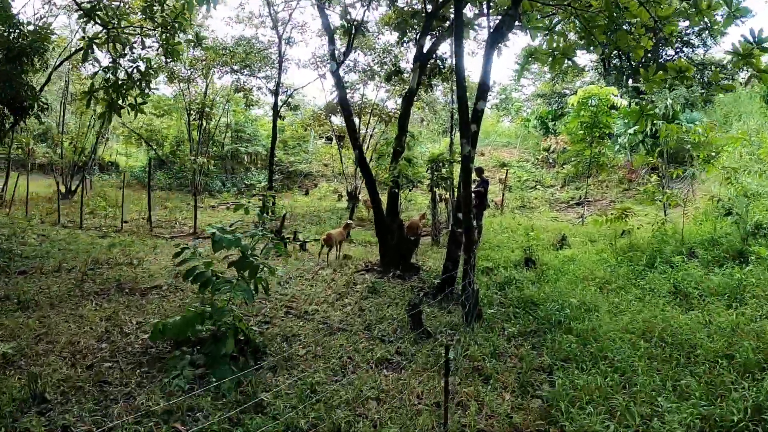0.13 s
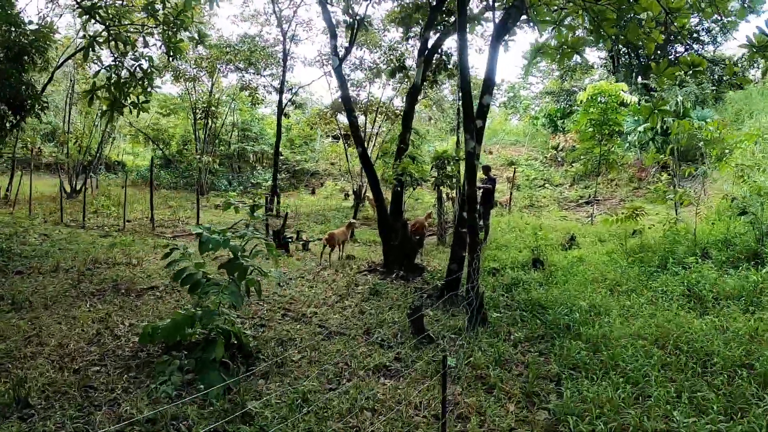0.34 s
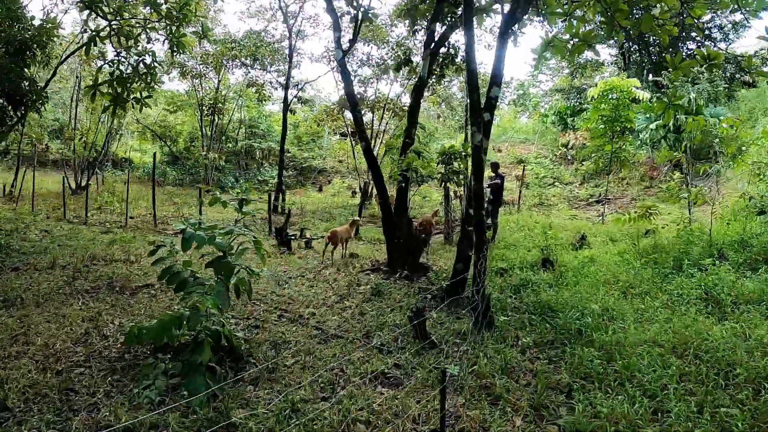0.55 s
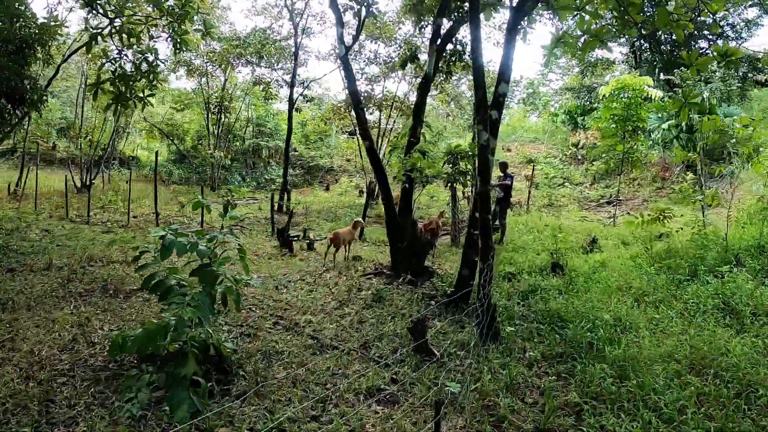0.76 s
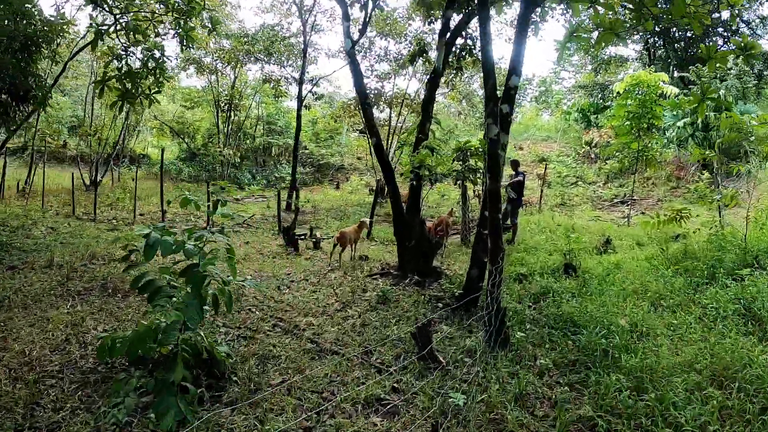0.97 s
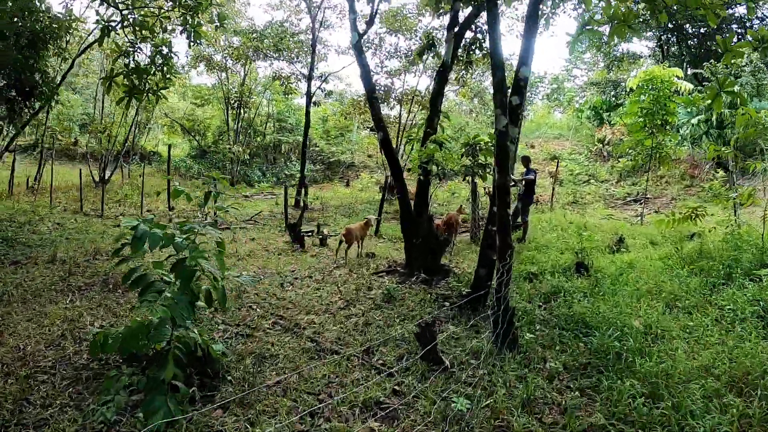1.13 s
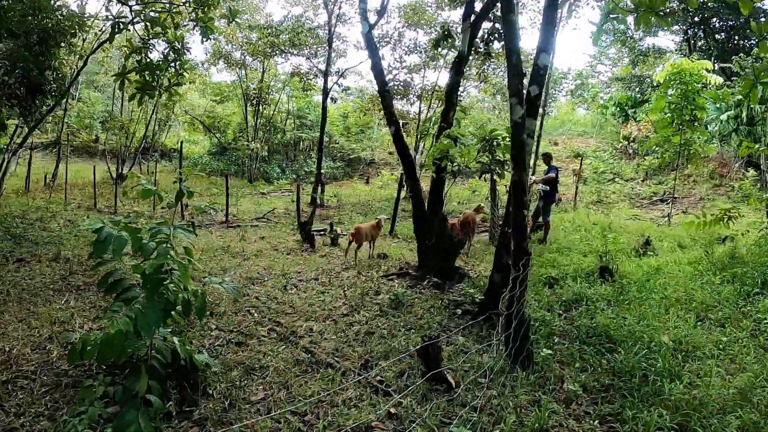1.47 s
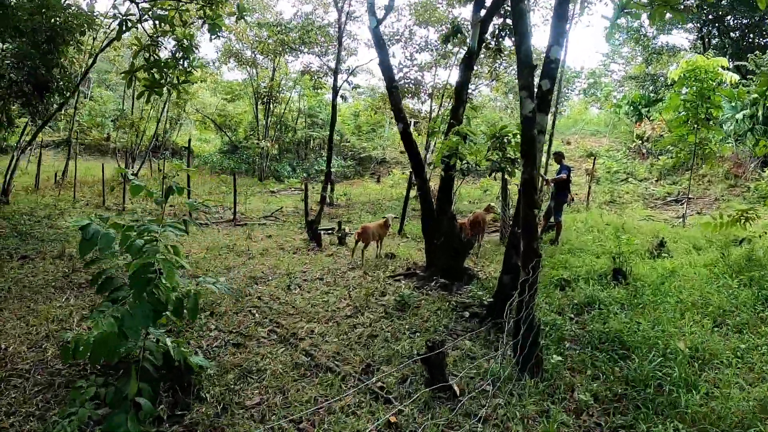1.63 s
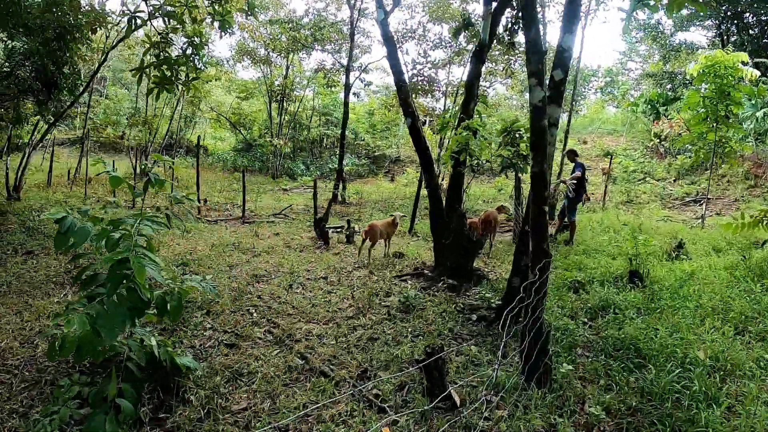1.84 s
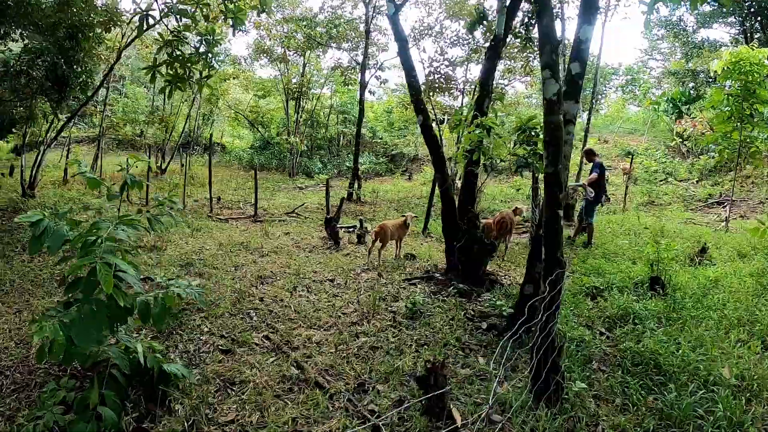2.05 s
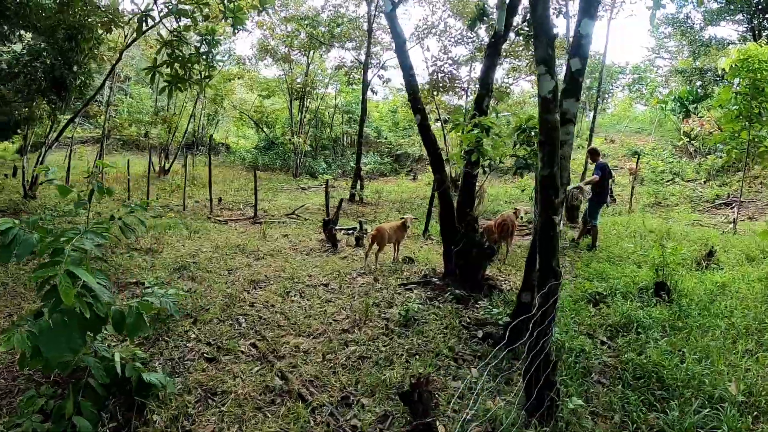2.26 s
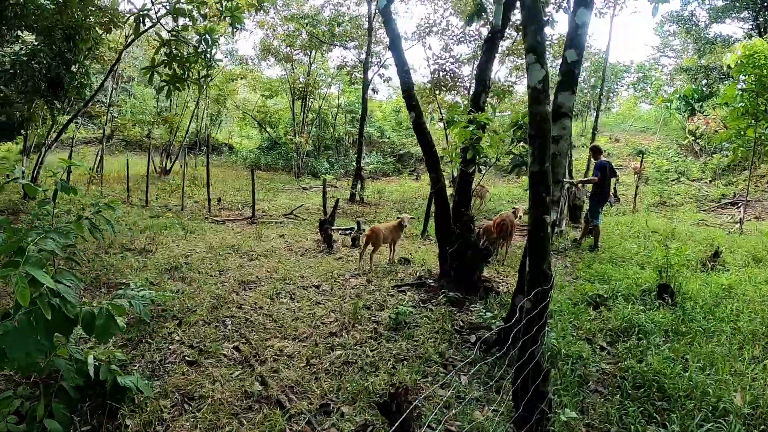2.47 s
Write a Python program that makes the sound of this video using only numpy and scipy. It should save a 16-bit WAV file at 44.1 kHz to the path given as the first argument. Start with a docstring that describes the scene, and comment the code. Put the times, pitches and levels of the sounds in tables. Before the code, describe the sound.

Sheep bleating loudly, a deep raspy call overlapped by a higher one, then rustling leafy footsteps

```python
"""Two sheep bleat over each other in a wooded pasture: a deep voice that sags slowly, and a higher one that slides up,
holds and drops away. Each voice is a row of clicks and noisy puffs that rings a moving throat.
Feet rustle (crackling grains), low thuds and a grunt sound (short tones), an insect buzzes (a narrow band of
noise that pulses) and the leaves hiss (patchy, coloured noise). Trunks scatter echoes, and a small camera
hears it all almost in mono."""
import sys
import numpy as np
from scipy import signal
from scipy.fft import rfft, irfft, next_fast_len
from scipy.io import wavfile
from scipy.ndimage import uniform_filter1d, map_coordinates

SR = 44100
rng = np.random.default_rng(int(sys.argv[2]) if len(sys.argv) > 2 else 0)


def file_out(sig):
    """Save sig as 16-bit WAV at sys.argv[1]."""
    # one column per channel
    cols = np.atleast_2d(sig).T
    # limit, then scale
    lim = np.clip(cols, -1, 1)
    pcm = np.round(lim * 32767).astype(np.int16)
    wavfile.write(sys.argv[1], SR, pcm)


N = 114660


def amp(db):
    """Turn decibels into a plain multiplier."""
    return 10 ** (np.asarray(db) / 20)


def unit(x):
    """Scale a sound to an rms level of 1."""
    return x / np.sqrt(np.mean(x ** 2) + 1e-20)


def wobble(rate):
    """A smooth random curve through `rate` random points a second."""
    points = rng.standard_normal(int(N * rate / SR) + 4)
    return map_coordinates(points, [np.arange(N) * rate / SR])


def filtered(x, response):
    """Change the strength and timing of each frequency by a complex response."""
    padded = next_fast_len(N + SR // 2)
    spectrum = rfft(x, padded) * response(np.fft.rfftfreq(padded, 1 / SR))
    return irfft(spectrum, padded)[..., :N]


def coloured(x, points):
    """Shape the tone of x by (pitch_hz, level_db) points on a log pitch axis, then set its rms to 1."""
    point_hz, point_db = np.transpose(points)

    def response(hz):
        return amp(np.interp(np.log(hz + 1), np.log(point_hz + 1), point_db))
    return unit(filtered(x, response))


def patchy(patchy_db):
    """White noise whose strength varies at random in patches of time and frequency."""
    z = signal.stft(rng.standard_normal(N), nperseg=512)[2]
    field = uniform_filter1d(rng.standard_normal(z.shape), 6, 0)  # smooth over frequency
    field = uniform_filter1d(field, 10, 1)  # smooth over time
    return signal.istft(z * amp(patchy_db * unit(field)), nperseg=512)[1][:N]


def throat_response(resonances, along, at, f):
    """Resonances of chest, throat and mouth add up, with alternating sign, as they move and flutter."""
    flutter_db, flutter_rate = .6, 25  # unsteady throat; rate in random points a second
    tract = 0
    for k, (hz, width, db) in enumerate(resonances):
        steps = np.linspace(0, 1, len(hz))
        centre = np.interp(along, steps, hz)
        gain = amp(np.interp(along, steps, db))
        gain = gain * amp(flutter_db * wobble(flutter_rate)[(at * SR).astype(int)])
        ring = 1j * f * width / (centre * centre - f * f + 1j * f * width)
        tract = tract + (-1) ** k * gain * ring
    return tract


def bleat(rows, resonances, jitter, shimmer_db, tremor, lag_s, rasp_start, rasp_end):
    """Each closing of the vocal folds is a click plus a puff of rasp that rings the slowly moving throat.

    jitter: timing scatter in cycles; tremor: slower timing wander in cycles; shimmer_db: size scatter.
    lag_s: delay at lag_hz by the end of the call; rasp_start, rasp_end: noisy share of the power, 0-1.
    """
    size = 1536  # samples in each pulse
    tremor_rate = 40  # random points a second
    rasp_s, rasp_above_hz = .009, 500  # decay of each puff; below this pitch the voice stays clearer
    lag_hz = 3000  # toward the end higher frequencies lag more, so the pulses sound softer

    s, pitch, level_db, bright_db = np.transpose(rows)
    t = np.arange(s[0], s[-1], 1 / SR)
    cycles = np.cumsum(np.interp(t, s, pitch)) / SR + tremor * wobble(tremor_rate)[:len(t)]

    # One row per cycle: timing luck, size luck, then the noise of its puff.
    luck = rng.standard_normal((int(cycles[-1]), size + 2))
    at = np.interp(np.arange(len(luck)) + .5 + jitter * luck[:, 0], cycles, t)[:, None]
    along = (at - s[0]) / (s[-1] - s[0])  # 0 at the start of the call, 1 at the end
    f = np.fft.rfftfreq(size, 1 / SR)

    # Even out the power of the throat, then tilt it brighter or darker.
    tract = throat_response(resonances, along, at, f)
    power = np.mean(abs(tract) ** 2, 1, keepdims=True) * np.interp(at, s, pitch) / SR
    tract = tract / np.sqrt(power) * amp(np.interp(at, s, bright_db) * np.log2(1 + f / 500))

    puff = luck[:, 2:] * np.exp(-np.arange(size) / (rasp_s * SR))
    puff = puff / np.linalg.norm(puff, axis=1, keepdims=True)
    rasp = np.interp(along, [0, 1], [rasp_start, rasp_end]) * f * f / (f * f + rasp_above_hz ** 2)
    source = np.sqrt(1 - rasp) + np.sqrt(rasp) * rfft(puff)

    start = np.floor(at * SR) - size // 8
    delay = at - start / SR + lag_s * along ** 2 * f / (2 * lag_hz)
    pulses = irfft(tract * source * np.exp(-2j * np.pi * f * delay))
    pulses = pulses * amp(np.interp(at, s, level_db) + shimmer_db * luck[:, 1:2])

    # Lay the overlapping pulses along the timeline, with spare room at both ends.
    where = (start + np.arange(size) + size).astype(int)
    return np.bincount(where.ravel(), pulses.ravel(), N + 2 * size)[size:size + N]


def deep_sheep():
    """The deep voice: its folds slow down, and rasp and treble lag grow toward the end."""
    # the course of the call: (time_s, pitch_hz, level_db before the tilt, brightness in dB per octave)
    call = [(-.03, 155, -20, 0), (.03, 159.5, -21, 0), (.12, 160.2, -22, 0), (.18, 158.2, -22, 0),
            (.31, 156.8, -24, 0), (.38, 152.3, -24, 0), (.45, 150, -24, 0), (.52, 149.3, -25, 0),
            (.57, 146.4, -26, 0), (.63, 145.4, -28, 0), (.71, 141.6, -28, 0), (.75, 138.9, -29, 0),
            (.86, 136.6, -29, 0), (.92, 133.6, -30, 0), (.97, 126, -31, 0), (.988, 125, -33, 0),
            (1.003, 124, -35, -5), (1.02, 121, -32, -13), (1.035, 112, -27, -14), (1.05, 104, -31, -18),
            (1.062, 104, -60, -18)]
    # resonances: (pitch_hz at even steps through the call, width_hz, level_db at the same steps)
    resonances = [([170, 157, 142, 140, 126], 134, [-14.5, -20, -19, -14.5, -9]),
                  ([712, 707, 762, 758, 765], 78, [-0.5, 2, 4.5, 1, -3]), ([1120, 1240, 1440, 1440, 1380],
                  150, [-9.5, -7.5, -5.5, -9.5, -13]), ([1607, 1587, 1680, 1632, 1765],
                  69, [2, 2, 2.2, 0.31, 0]), ([2383, 2400, 2480, 2500, 2480], 100, [2.5, 2.5, -1, -4, -4]),
                  ([2910, 2900, 2950, 3030, 3100], 190, [-7.5, -5.5, -5.5, -5, -6]),
                  ([3700, 3560, 3600, 3650, 3650], 530, [-17.5, -14, -18, -15.5, -15.5]),
                  ([5360, 5020, 5170, 5000, 4380], 330, [-17.5, -13.5, -21, -19, -31]),
                  ([6550, 6300, 6260, 6600, 7000], 1260, [-31.5, -22, -24, -38, -37]),
                  ([9700, 9600, 9400, 8000, 6500], 420, [-38, -35, -47, -38, -48])]
    return bleat(call, resonances, jitter=.004, shimmer_db=.5, tremor=.032, lag_s=.002,
                 rasp_start=.24, rasp_end=.34)


def high_sheep():
    """The higher voice: steadier timing and less rasp."""
    # the course of the call: (time_s, pitch_hz, level_db before the tilt, brightness in dB per octave)
    call = [(.05, 154.4, -68, -19), (.085, 162.6, -46, -17), (.13, 178.1, -33, 3.5), (.165, 196.6, -29, 3),
            (.2, 210.1, -25, 1.5), (.26, 215.4, -25, 1.5), (.345, 221.5, -22, 0.5),
            (.39, 217.1, -22.5, 0.5), (.445, 212.5, -23, -1), (.49, 214.7, -27, 1.5),
            (.545, 211.2, -21.5, -1), (.585, 209.5, -23, 0), (.64, 204.3, -24.5, -1),
            (.68, 203.9, -23.5, -1), (.72, 201, -25, -0.5), (.76, 196.6, -30, 0.5),
            (.79, 185.8, -22.5, -1.5), (.81, 181, -25, -22), (.835, 163, -62, 20)]
    # resonances: (pitch_hz at even steps through the call, width_hz, level_db at the same steps)
    resonances = [([195, 215, 242.5, 250], 350, [-4, -12.5, -19, -5.5]), ([440, 450, 390, 342],
                  216, [-6.5, -6.5, -10.5, -1]), ([695, 618, 726, 783], 62, [2.5, -0.5, -8, 8]),
                  ([1110, 1100, 1130, 1120], 150, [-7.5, -4.5, -9, -8]), ([1390, 1514, 1510, 1430],
                  119, [0.5, 1.5, -2, 3]), ([2320, 2505, 2424, 2380], 128, [4, 3.5, -1.5, 1]),
                  ([2830, 2790, 2900, 2980], 94, [-0.75, -1.8, 0.14, 2]), ([3220, 2980, 3040, 3570],
                  730, [-12, -16, -15, -12]), ([5270, 4600, 4690, 4500], 456, [-16.5, -16, -15, -13]),
                  ([6230, 5850, 6150, 6500], 1230, [-30, -30, -28, -23]), ([10200, 10800, 9000, 7950],
                  500, [-27, -44, -54, -60])]
    return bleat(call, resonances, jitter=.0025, shimmer_db=.7, tremor=.012, lag_s=.0005,
                 rasp_start=.1, rasp_end=.1)


def soften_treble(x):
    """Random small time shifts soften the clicks of the voices in the treble; the top is dulled."""
    shift_above_hz, shift_s = 4500, .0014  # the shifts set in around this pitch; their typical size
    step_hz, dull_hz = 500, 11500  # spacing of the random shifts; where the dulling sets in
    knots = rng.standard_normal(SR // step_hz)

    def path(f):
        delay = shift_s * map_coordinates(knots, [f / step_hz]) / (1 + (shift_above_hz / (f + 1)) ** 4)
        phase = -2j * np.pi * np.cumsum(delay) * f[1]
        return np.exp(phase) / (1 + (f / dull_hz) ** 8)
    return filtered(x, path)


def trees(x):
    """Trunks and ground scatter the sound into a dense, fading tail of echoes."""
    fade_s, gap_s = .3, .008  # time to fall by 60 dB; silence before the first echo
    t = np.arange(SR // 2) / SR
    tail = rng.standard_normal(len(t)) * amp(-60 * t / fade_s) * (t > gap_s)
    return signal.fftconvolve(x, tail / np.linalg.norm(tail))[:N]


def rustle():
    """Feet in leaf litter: a dense crackle of random grains swells and fades with each step."""
    # steps: (peak_s, rise_s, fall_s, level_db, weight of the low crunch in dB)
    steps = [(.335, 0.016, 0.051, -32.5, -3), (1.02, 0.16, 0.074, -42.5, 1), (1.2, 0.17, 0.095, -47, 8),
             (1.345, 0.02, 0.0057, -57, 21.5), (1.46, 0.061, 0.043, -59, 21),
             (1.55, 0.043, 0.059, -41, 4.5), (1.63, 0.025, 0.23, -52, 10), (1.74, .008, 0.0088, -46.5, 2),
             (1.88, 0.035, 0.083, -49, 1), (2.0, 0.03, 0.05, -57, -1), (2.38, 0.044, 0.031, -46, 6.5),
             (2.458, 0.037, 0.051, -44.5, 0), (2.58, 0.066, .05, -43.5, 2.5)]
    # tone of the litter: (pitch_hz, relative level in dB per Hz)
    litter = [(100, -23.5), (300, 0), (700, -1), (2500, -3), (5000, -10), (9000, -21.5), (13000, -27),
              (15000, -47)]
    grains_per_s, grain_spread_db = 4000, 3
    t = np.arange(N) / SR
    grains = (rng.random(N) < grains_per_s / SR) * rng.standard_normal(N)
    grains = grains * amp(grain_spread_db * rng.standard_normal(N))
    crackle = coloured(unit(grains) + 0.39 * patchy(patchy_db=2.5), litter)
    low = filtered(crackle, lambda f: 1 / (1 + (f / 700) ** 4))
    out = np.zeros(N)
    for s, rise, fall, db, low_db in steps:
        swell = np.exp(-((t - s) / np.where(t < s, rise, fall)) ** 2)
        out += amp(db) * swell * (crackle + (amp(low_db) - 1) * low)
    return out


def thuds_and_grunt():
    """Soft low thuds and knocks, and the low grunt that ends the deep bleat at 1.03 s: short swelling tones."""
    # tones: (peak_s, pitch_hz, peak level_db)
    tones = [(.3, 473, -32), (.45, 89, -50), (0.561, 100, -51), (.96, 440, -42), (1.032, 210, -37),
             (1.169, 200, -46.5), (1.338, 184, -47), (1.619, 510, -42), (1.715, 700, -41),
             (1.741, 1500, -38), (2.335, 394, -45.5), (2.39, 80.5, -62)]
    longest_s, most_cycles = .013, 6.2  # limits on the swell and fade time; higher knocks are shorter
    t = np.arange(N) / SR
    out = np.zeros(N)
    for s, hz, db in tones:
        swell = np.exp(-((t - s) / min(longest_s, most_cycles / hz)) ** 2)
        out += amp(db) * swell * np.cos(2 * np.pi * hz * (t - s))
    return out


def insect():
    """A narrow band of noise buzzes, pulsing at the wing rate."""
    centre_hz, width_hz, level_db = 7163, 360, -55
    wing_hz, drift_hz, depth = 87, 5, .3  # pulses a second, their wander, and depth 0-1

    def band(f):
        return np.exp(-.5 * ((f - centre_hz) / (width_hz / 2)) ** 2)
    wing_cycles = np.cumsum(wing_hz + drift_hz * wobble(5.2)) / SR
    beat = 1 + depth * np.sin(2 * np.pi * wing_cycles)
    buzz = unit(beat * filtered(rng.standard_normal(N), band))
    return amp(level_db + 0.64 * wobble(5.5)) * buzz


def leaves():
    """Foliage hisses: patchy coloured noise at a slowly changing level."""
    # tone of the hiss: (pitch_hz, relative level in dB per Hz)
    tone = [(24, -66), (40, -29), (98, -35), (165, -5), (258, -2.5), (789, -5), (1180, -5.5), (2600, -5.5),
            (6060, -20), (7210, -18), (7770, -25), (12200, -33), (15200, -72)]
    # loudness of the hiss: (time_s, level_db)
    loudness = [(0, -38), (1.25, -43), (1.39, -43.5), (1.45, -43), (2.25, -42.5), (2.6, -43)]
    s, db = np.transpose(loudness)
    level_db = np.interp(np.arange(N) / SR, s, db) + 0.48 * wobble(8.54)
    return amp(level_db) * coloured(patchy(patchy_db=1.0), tone)


def side_hiss():
    """A faint patchy hiss, opposite in left and right."""
    # tone of the hiss: (pitch_hz, relative level in dB per Hz)
    tone = [(24, -32), (40, 12), (1790, -10), (1980, -5), (3260, -9), (3780, 1), (6690, -2), (13400, -6),
            (15200, -26)]
    return amp(-73.5) * coloured(patchy(patchy_db=10.5), tone)


def side_wash(near):
    """Faint coloured noise that follows the loudness of the near sounds, opposite in left and right."""
    # tone of the wash: (pitch_hz, relative level_db)
    tone = [(60, -30), (250, -10), (600, -33), (2500, -52.5), (5000, -5), (9000, -2), (13000, 14)]
    smeared = trees(near)  # the same kind of random fading tail
    return amp(-64.5) * coloured(smeared, tone)


def scene():
    """Mix the shared sound, then add the faint side part to the left and take it from the right."""
    sheep = soften_treble(deep_sheep() + high_sheep())
    near = sheep + rustle() + thuds_and_grunt()
    echoes = amp(-11) * trees(sheep)
    mid = near + echoes + insect() + leaves()
    side = side_hiss() + side_wash(near)
    return np.array([mid + side, mid - side])


def record(dry):
    """The camera rolls off the deep bass and the top, and keeps nothing above its band limit."""
    low_cut_hz, roll_off_hz, top_hz = 27, 13900, 15500

    def response(hz):
        bass = (1j * hz / (low_cut_hz + 1j * hz)) ** 2
        return (hz < top_hz) * bass / (1 + (hz / roll_off_hz) ** 40)
    return filtered(dry, response)


dry = scene()
out = record(dry)
file_out(out)
```